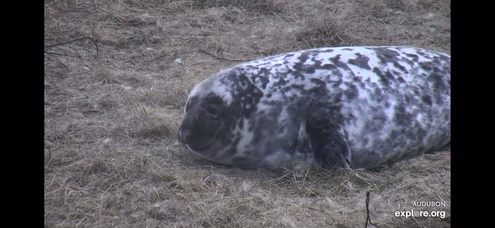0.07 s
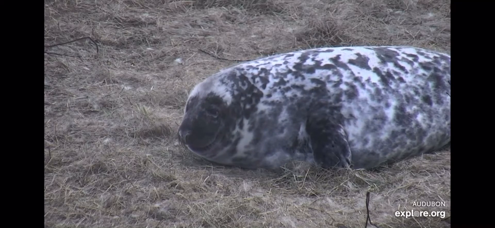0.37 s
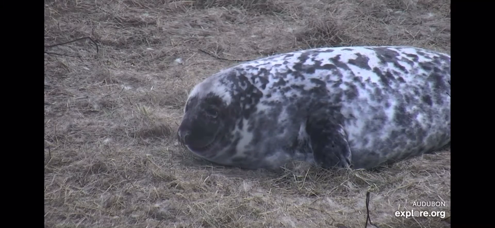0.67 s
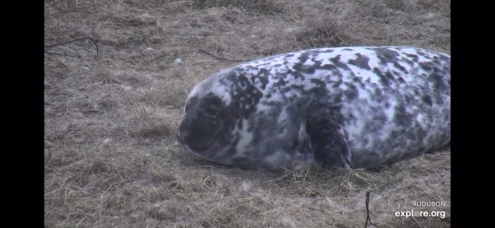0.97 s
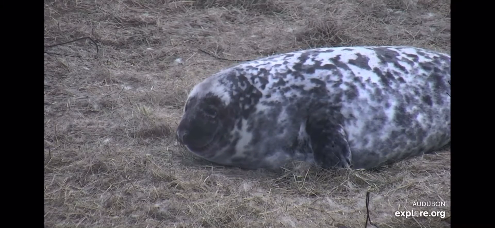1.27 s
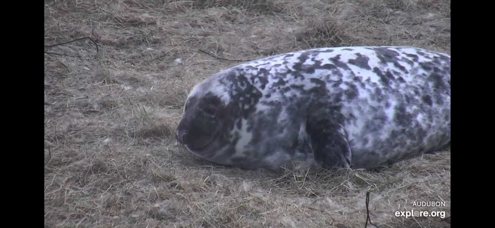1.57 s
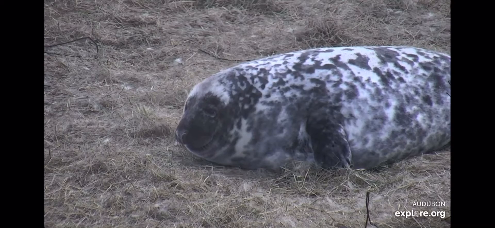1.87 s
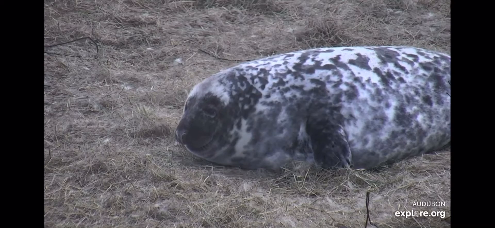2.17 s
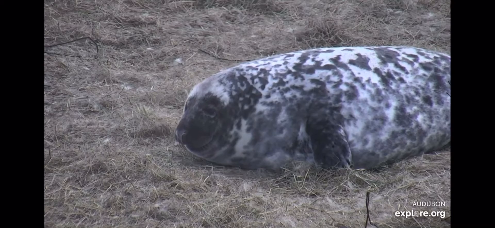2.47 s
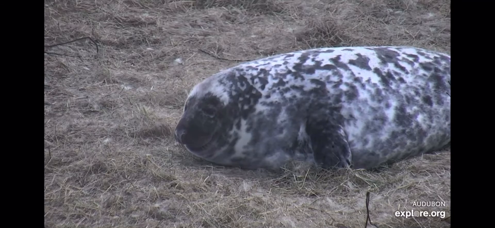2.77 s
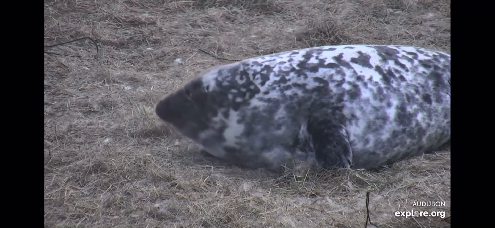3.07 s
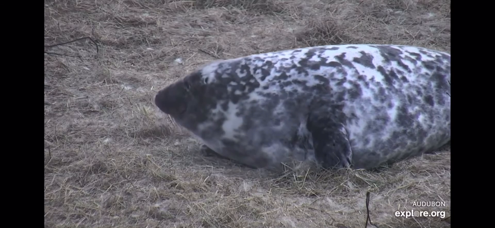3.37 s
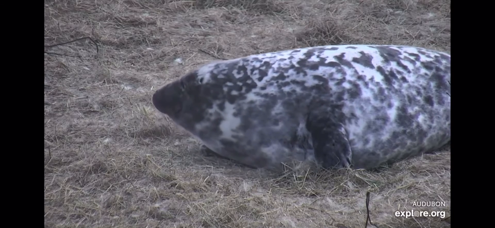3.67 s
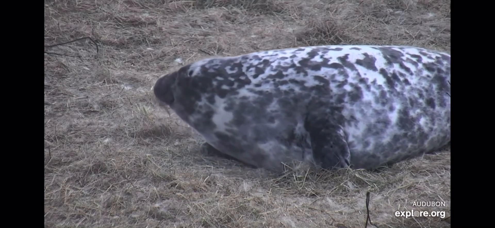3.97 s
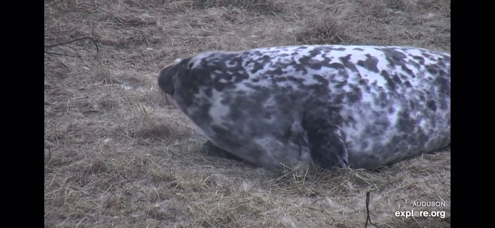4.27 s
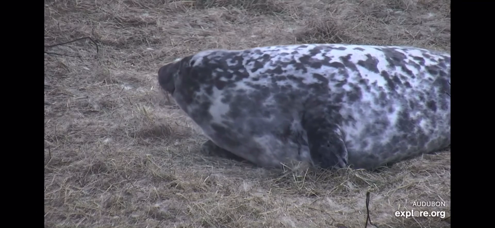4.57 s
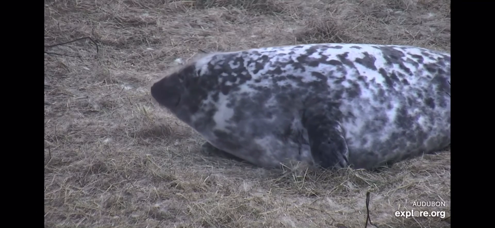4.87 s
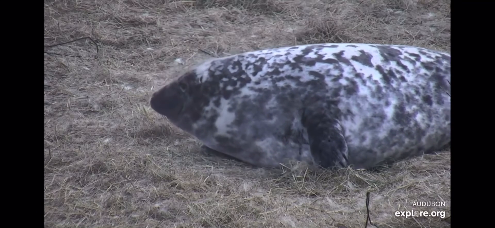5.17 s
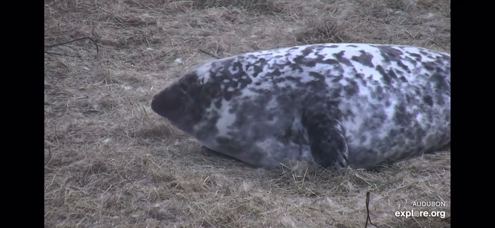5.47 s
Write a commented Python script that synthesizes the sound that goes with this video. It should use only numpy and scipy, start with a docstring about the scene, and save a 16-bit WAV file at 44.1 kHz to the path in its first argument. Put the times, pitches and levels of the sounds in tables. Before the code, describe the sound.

Wind buffets an outdoor microphone in open grassland throughout, a deep rumble with quick, irregular, fluttering thumps. Moderate gusts come in the first half second and again around 1.2 seconds, then the wind slackens, reaching its calmest at about 2.5 seconds. A fresh gust hits near 3 seconds and uneven puffs follow. From 4.5 seconds the wind grows louder and slightly brighter, with the strongest hit at about 5.3 seconds, staying strong to the end.

Everything else is very faint. A steady, slightly hollow airy rush sits behind the wind, with a small fan's hum and thin electronic hiss. One short, distant hoot sounds at about 0.3 seconds. Dry grass swishes softly near 1.3 and 2.9 seconds, and single stalks give tiny ticks now and then, clearest around 3.8, 4.4 and 5.2 seconds.

```python
"""Gusts of wind buffet an outdoor camera's microphone in open grassland, low and rumbling.
The breeze under them slackens, then freshens, and the wind brightens as it grows.
Behind it is a faint airy rush, coloured by the housing. Dry grass rustles and ticks now and then,
and something hoots once, far away. A small motor, probably a fan, hums over the circuits' hiss."""
import sys
import numpy as np
from scipy import signal
from scipy.fft import rfft, irfft, next_fast_len
from scipy.io import wavfile
from scipy.ndimage import uniform_filter1d, map_coordinates

SR = 44100
rng = np.random.default_rng(int(sys.argv[2]) if len(sys.argv) > 2 else 0)


def unload_wav(signal):
    """Save mono or channel-first audio to the path in sys.argv[1] as 16-bit WAV at rate SR, clipped to [-1, 1]."""
    wavfile.write(
        sys.argv[1],
        SR,
        np.round(np.clip(np.atleast_2d(signal).T, -1, 1) * 32767).astype(np.int16),
    )


N = 247842

# tone of the large, middling and small eddies: freq_hz, gain_db
RUMBLE_EQ = [(8, -31), (16, 0), (22, 1), (30, -2.5), (40, -8.5), (55, -25), (100, -61.5), (200, -120)]
BUFFET_EQ = [(25, -32.5), (44, 0.5), (54, 2.5), (78, -6), (98, -15), (140, -30.5), (250, -56), (600, -120)]
FLUTTER_EQ = [(55, -32.5), (88, 1.5), (112, -3), (135, -7.5), (175, -14), (220, -19.5), (300, -29),
              (450, -37.5), (800, -55), (2000, -120)]
def wind():
    """Eddies press on the microphone port; the small ones grow fastest with the wind."""
    large_db, middling_db, small_db = wind_strength(-1), wind_strength(0), wind_strength(1)
    rumble = amp(-25.5 + .92 * large_db) * turbulence(RUMBLE_EQ, even_s=.07)
    buffet = amp(-33 + .9 * middling_db) * turbulence(BUFFET_EQ, even_s=.062)
    flurries = unit(amp(1.2 * wobble(45)))  # small eddies come in quick bursts
    flutter = amp(-43 + .99 * small_db) * flurries * turbulence(FLUTTER_EQ, even_s=.059)
    return rumble + buffet + flutter


# the bed of breeze; positive brightness favours small eddies: time_s, strength_db, brightness_db
BREEZE_BED = [(0, -36, -1.5), (.65, -38.5, -.5), (1.1, -40, 0), (1.55, -38.5, -1), (2.0, -39.5, .5),
              (2.35, -36, 1.5), (2.76, -40, -.5), (3.15, -34, .5), (3.5, -34.5, 1.5), (3.9, -36.5, .5),
              (4.3, -35, 2), (4.7, -33, 1), (5.13, -29, 0), (5.6, -25.5, 0)]
# gusts hitting the port: peak_s, strength_db, half_length_s, brightness_db
GUST_HITS = [(0.054, -29, 0.13, 1), (0.254, -22, 0.028, -3.5), (0.376, -22.5, 0.045, 1),
             (0.486, -30.5, 0.025, 2), (0.581, -30, 0.048, 4.5), (0.75, -26.0, 0.041, -3),
             (0.906, -25.5, 0.038, -5.5), (1.036, -29.5, 0.042, -4), (1.23, -24, 0.04, -1.5),
             (1.332, -29, 0.033, 3.5), (1.44, -33.5, 0.042, -2.5), (1.693, -27.0, 0.059, -2.5),
             (1.854, -28.5, 0.039, -4), (2.142, -27, 0.033, -2.5), (2.262, -30, 0.026, 4.5),
             (2.458, -39, 0.019, 4), (2.59, -37.5, 0.059, -1.5), (2.846, -32.5, 0.028, -3),
             (2.943, -22, 0.058, 1.5), (3.051, -23.5, 0.044, 4), (3.196, -28.5, 0.036, -2.5),
             (3.36, -27.5, 0.051, -2), (3.555, -29, 0.063, 2.5), (3.672, -28.5, 0.044, 2),
             (3.773, -26, 0.029, 1.5), (3.97, -27, 0.029, -2.5), (4.142, -31, 0.066, 2.5),
             (4.315, -33, 0.072, 0.5), (4.446, -29.5, 0.02, 6), (4.544, -20.5, 0.031, 1.5),
             (4.665, -21, 0.045, 1.5), (4.754, -22.5, 0.029, -1.5), (4.844, -26, 0.036, 4.5),
             (4.979, -20.5, 0.053, 4), (5.127, -23, 0.025, -1.5), (5.263, -12, 0.054, 1.5),
             (5.366, -19.5, 0.034, 4.5), (5.444, -18, 0.019, -4), (5.551, -20.5, 0.067, 5.5)]
def wind_strength(fineness):
    """Gusts add their power to the breeze: dB over the usual, for large (-1) to small (+1) eddies."""
    usual_db, rise_share = -30, .99
    breeze_db, breeze_brightness_db = curves(BREEZE_BED)
    power = amp(breeze_db + fineness * breeze_brightness_db) ** 2
    for peak_s, strength_db, half_length_s, brightness_db in GUST_HITS:
        envelope = swell(peak_s, half_length_s * np.where(clock() < peak_s, rise_share, 1))
        power += amp(strength_db + fineness * brightness_db) ** 2 * envelope
    return 10 * np.log10(power) - usual_db


# tone of the sub-bass heave: freq_hz, gain_db
HEAVE_EQ = [(1, -7), (3.5, 0), (9, -8), (14, -13), (20, -29), (35, -65), (100, -120)]
# its fader ride: time_s, level_db
HEAVE_RIDE = [(0, -13.5), (.7, -17), (1.2, -13.5), (1.7, -14), (2.05, -21), (2.7, -19), (3.3, -15),
              (3.75, -11), (4.3, -12.5), (4.9, -14), (5.3, -17), (5.6, -15)]
def heave():
    """The wind's pressure rises and falls slowly, below hearing."""
    level_db, = curves(HEAVE_RIDE)
    return amp(level_db) * turbulence(HEAVE_EQ, even_s=.17)


# tone of the far rush: freq_hz, gain_db
RUSH_EQ = [(120, -35.5), (280, -5), (420, -1.5), (560, -2.5), (700, 1), (770, -6.5), (1120, -5.5),
           (1350, -2), (1600, -2.5), (2080, -4), (2280, -6.5), (2650, -10.5), (3300, -19.5), (6500, -49)]
# its fader ride: time_s, level_db
RUSH_RIDE = [(0, -57.5), (.8, -57.5), (1.35, -56.5), (1.75, -57), (2.2, -57), (2.6, -56.5), (3.05, -56.5),
             (3.6, -58.2), (4.15, -59.5), (4.7, -58), (5.0, -58), (5.6, -57)]
# soft breaths on top: peak_s, level_db, pitch_hz, width_hz, half_length_s
BREATHS = [(.56, -63, 1450, 400, .09), (2.24, -60, 1900, 700, .26), (2.3, -64.5, 640, 200, .3),
           (2.68, -62, 660, 110, .05), (4.32, -60.5, 630, 150, .05), (4.8, -64.5, 620, 200, .17),
           (4.89, -60, 1670, 450, .07)]
def air():
    """The far rush of the wind with a few brief swells, all coloured by the housing."""
    ride_db, = curves(RUSH_RIDE)
    rush = amp(ride_db + .47 * wobble(9.9)) * noise(lambda hz: colour(RUSH_EQ, hz) * housing(hz))
    for peak_s, level_db, pitch_hz, width_hz, half_length_s in BREATHS:
        breath = noise(lambda hz: bell(hz, pitch_hz, width_hz) ** 2 * housing(hz))
        rush += amp(level_db) * swell(peak_s, half_length_s) * breath
    return rush


# resonant peaks of the housing: centre_hz, width_hz, boost_db
HOUSING_PEAKS = [(476, 22, 11), (655, 90, 2.5), (970, 80, 4), (1095, 40, 3), (1232, 45, 3), (1390, 80, 3.5),
                 (1714, 55, 6), (1866, 55, 6.5), (2075, 80, 6.5), (2420, 70, 3), (2630, 70, 2.5),
                 (3110, 80, 4)]
def housing(hz):
    """The camera's housing resonates, lifting narrow bands: its gain at hz."""
    return amp(sum(boost_db * bell(hz, centre_hz, width_hz)
                   for centre_hz, width_hz, boost_db in HOUSING_PEAKS))


# tone of the light rustle and of the swishes: freq_hz, gain_db
RUSTLE_EQ = [(1500, -40.5), (3300, 4.5), (5100, 2), (6000, -7.5), (9000, -11), (14000, -23)]
SWISH_EQ = [(1500, -30), (3000, 0), (5200, 1), (6200, -3), (8000, -7), (10000, -12), (14000, -24)]
# swishes of dry grass: peak_s, level_db, half_length_s
SWISH_CUES = [(1.256, -75, 0.085), (1.54, -81, 0.055), (2.886, -77, 0.048)]
def grass():
    """Dry blades brush in bright, grainy swishes over a fading rustle."""
    def grainy(eq):
        return unit(amp(1.7 * wobble(150)) * noise(lambda hz: colour(eq, hz)))
    fade_db_per_s = 2.5
    rustle = amp(-76.5 - fade_db_per_s * clock()) * grainy(RUSTLE_EQ)
    swish_power = sum(amp(level_db) ** 2 * swell(peak_s, half_length_s)
                      for peak_s, level_db, half_length_s in SWISH_CUES)
    return rustle + np.sqrt(swish_power) * grainy(SWISH_EQ)


# ticks of dry stalks: start_s, level_db, pitch_hz
TICK_CUES = [(.188, -65, 4800), (.477, -67, 5100), (1.648, -68.5, 4500), (1.684, -68.5, 4500),
             (3.791, -63.5, 3400), (4.023, -67.5, 3600), (4.445, -61, 3300), (5.17, -57, 2720)]
def stalks():
    """Single stalks tick with a short, rough ring."""
    attack_s, ring_s = .001, .048  # the ring falls 60 dB in ring_s
    ticks = np.zeros(N)
    for start_s, level_db, pitch_hz in TICK_CUES:
        age_s = np.maximum(clock() - start_s, 0)
        envelope = (1 - np.exp(-age_s / attack_s)) * amp(-60 * age_s / ring_s)
        ticks += amp(level_db) * envelope * tone(pitch_hz * age_s, jitter_rad=wobble(900))
    return ticks


def hoot():
    """One short, faint hoot, probably a far animal: a husky tone that sags in pitch."""
    peak_s, half_length_s = .267, .026
    pitch_hz = 665 - 14 * np.tanh((clock() - peak_s) / half_length_s)
    voice = tone(np.cumsum(pitch_hz) / SR, jitter_rad=.8 * wobble(110))
    return amp(-54) * swell(peak_s, half_length_s) * voice


# partials of the fan's hum: shaft_multiple, level_db
FAN_PARTIALS = [(6, -75), (8, -65.5), (9, -80.5), (10, -71), (11, -64), (12, -73), (13, -75), (18, -79.5)]
def fan():
    """A slightly unsteady shaft hums in wavering harmonics; the higher ones are rougher."""
    shaft_hz = 45.52 * (1 + .0018 * wobble(5))
    turns = np.cumsum(shaft_hz) / SR
    hum = np.zeros(N)
    for multiple, level_db in FAN_PARTIALS:
        waver = unit(amp(1.1 * wobble(3.7) + 1.8 * wobble(20)))
        partial = tone(multiple * turns + rng.random(), jitter_rad=multiple * .043 * wobble(30))
        hum += amp(level_db) * waver * partial
    return hum


# thin whine of the circuits: pitch_hz, level_db
WHINE_TONES = [(11239, -100), (15734, -83.5)]
# tone of their hiss: freq_hz, gain_db
HISS_EQ = [(100, 5.5), (3000, 1), (4900, 2), (6000, -4), (9000, -7), (12500, -8.5), (15000, -5.5),
           (15700, -4.5)]
def electronics():
    """The camera's circuits give off an even hiss and a thin, wavering whine."""
    whine = sum(amp(level_db) * unit(amp(2 * wobble(40))) * tone(pitch_hz * clock())
                for pitch_hz, level_db in WHINE_TONES)
    return whine + amp(-72.5) * noise(lambda hz: colour(HISS_EQ, hz))


def turbulence(eq, even_s):
    """Churning noise of rms 1 whose strength stays even over even_s seconds."""
    churn = noise(lambda hz: colour(eq, hz))
    window = int(even_s * SR)
    power = uniform_filter1d(uniform_filter1d(churn ** 2, window), window)
    return unit(churn / np.sqrt(np.abs(power) + 1e-6))


def noise(gain):
    """Noise of rms 1 shaped by a gain of frequency."""
    size = next_fast_len(N + SR // 2)
    spectrum = rfft(rng.standard_normal(size)) * gain(np.fft.rfftfreq(size, 1 / SR))
    return unit(irfft(spectrum, size)[:N])


def tone(cycles, jitter_rad=0):
    """A sine of rms 1, roughened by phase jitter."""
    return np.sqrt(2) * np.sin(2 * np.pi * cycles + jitter_rad)


def colour(eq, hz):
    """Gain of an EQ curve, its points joined on a log axis."""
    freq_hz, gain_db = np.transpose(eq)
    return amp(np.interp(np.log(hz + 1), np.log(freq_hz + 1), gain_db))


def bell(hz, centre_hz, width_hz):
    """Shape of one resonance, 1 at its centre."""
    return 1 / (1 + (2 * (hz - centre_hz) / width_hz) ** 2)


def swell(peak_s, half_length_s):
    """A smooth rise and fall, 1 at its peak."""
    return np.exp(-((clock() - peak_s) / half_length_s) ** 2)


def wobble(rate_hz):
    """A smooth random curve, rate_hz knots a second."""
    knots = rng.standard_normal(int(N * rate_hz / SR) + 4)
    return map_coordinates(knots, [clock() * rate_hz])


def curves(rows):
    """One value per sample for each column after the time."""
    time_s, *columns = np.transpose(rows)
    return [np.interp(clock(), time_s, column) for column in columns]


def clock():
    """The time of each sample in seconds."""
    return np.arange(N) / SR


def amp(db):
    """Decibels to gain."""
    return 10 ** (np.asarray(db) / 20)


def unit(x):
    """Scale to rms 1."""
    return x / np.sqrt(np.mean(x ** 2) + 1e-20)


def scene():
    """All sources at the one microphone."""
    return (heave() + wind() + air() + grass() + stalks() + hoot() + fan() + electronics())[None]


def record(dry):
    """The camera keeps nothing above its band limit."""
    top_hz = 15790
    taps = signal.firwin(1025, top_hz, fs=SR, window="blackman")
    padded = np.pad(dry, ((0, 0), (len(taps) // 2,) * 2), mode="reflect", reflect_type="odd")
    return signal.fftconvolve(padded, taps[None], mode="valid", axes=1)


dry = scene()
out = record(dry)
unload_wav(out)
```